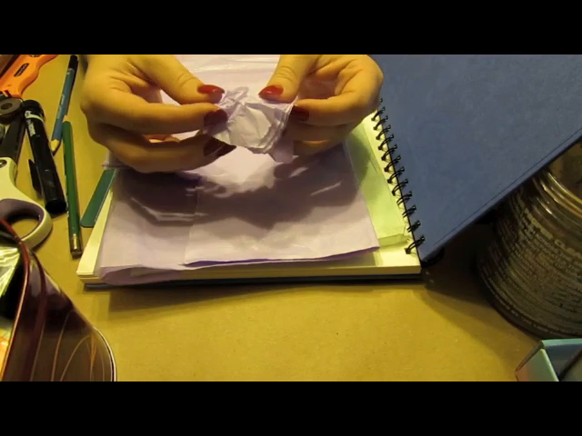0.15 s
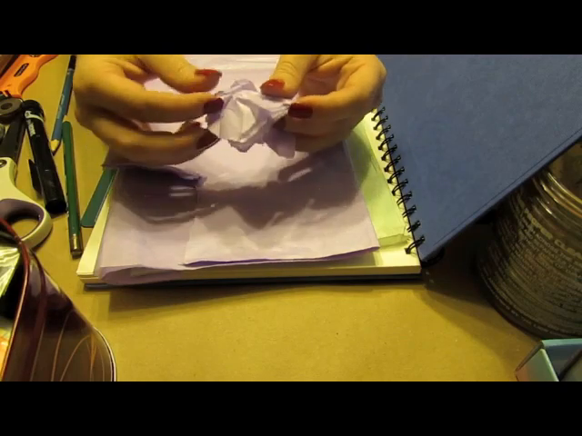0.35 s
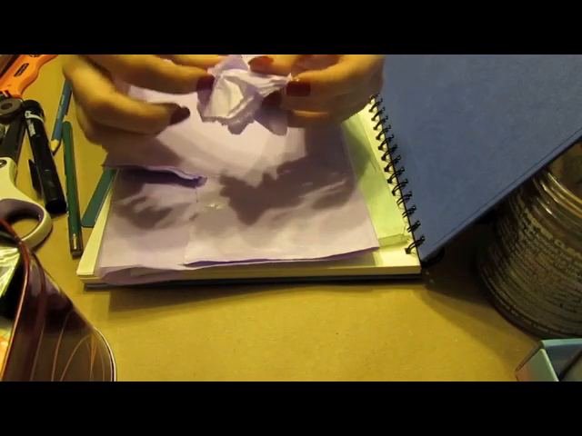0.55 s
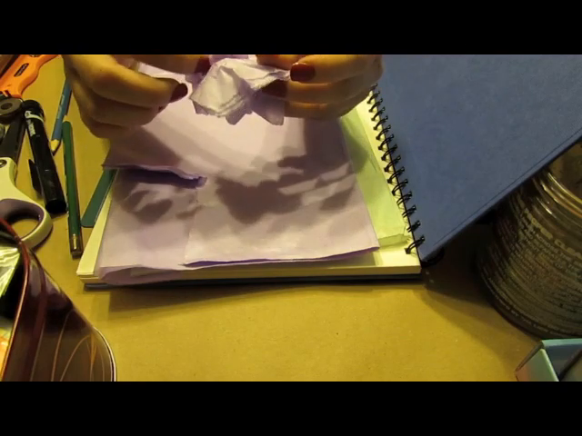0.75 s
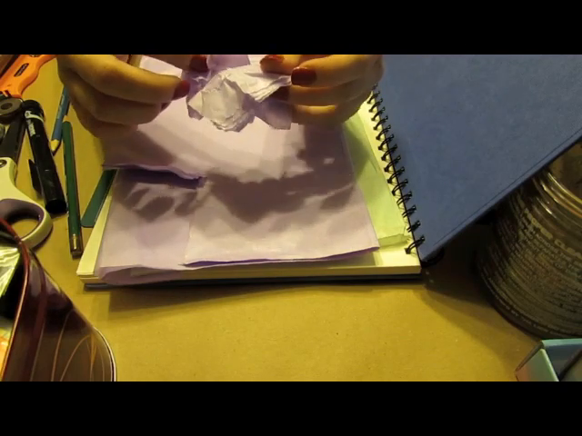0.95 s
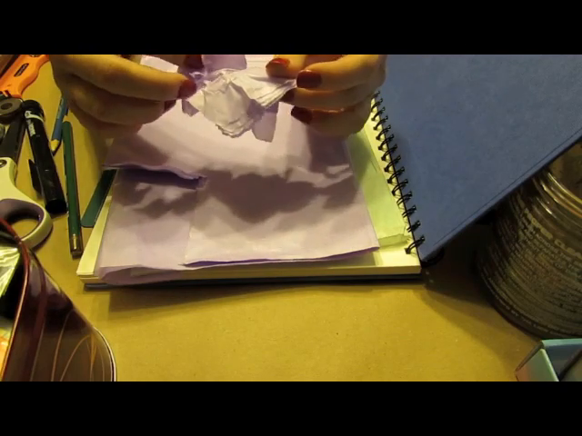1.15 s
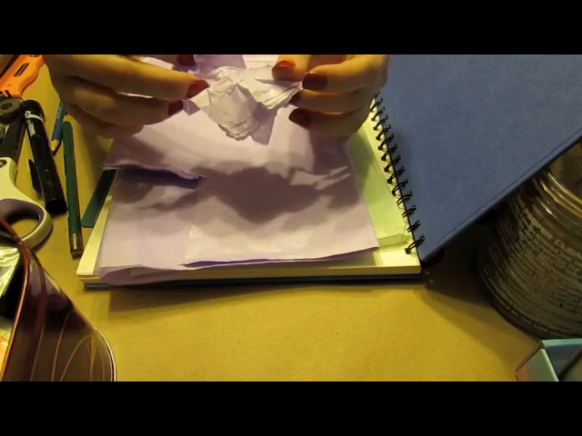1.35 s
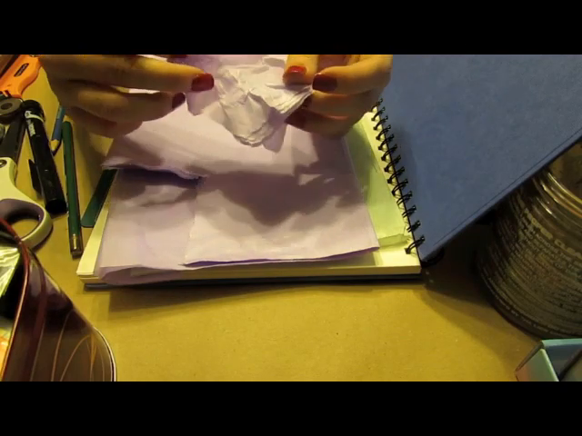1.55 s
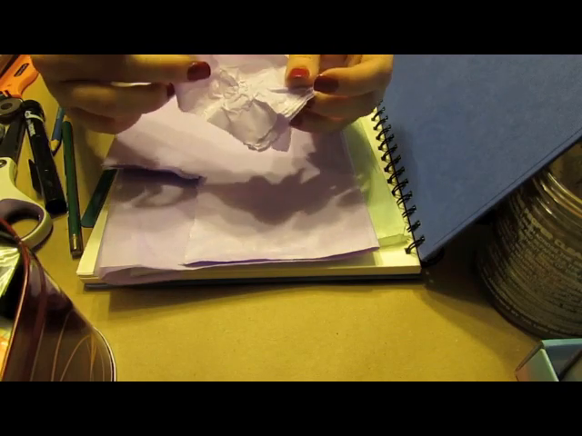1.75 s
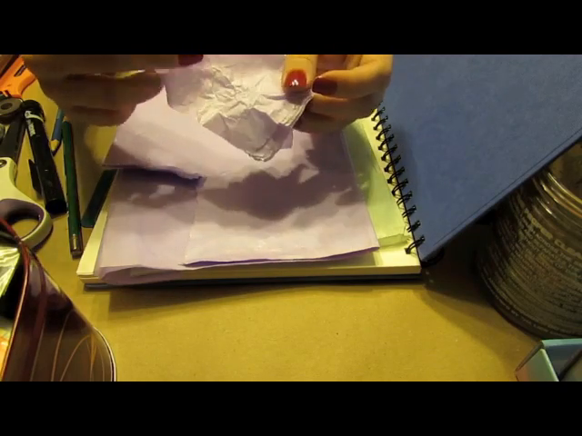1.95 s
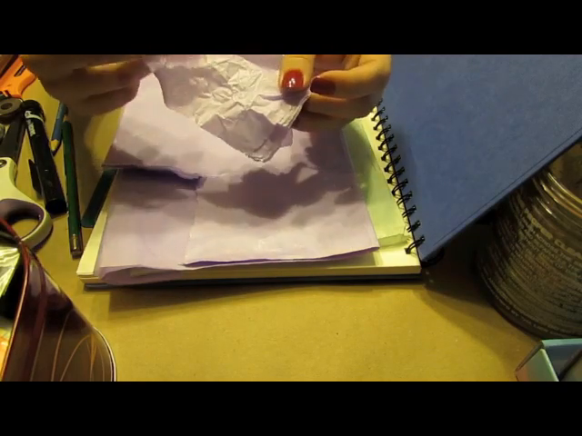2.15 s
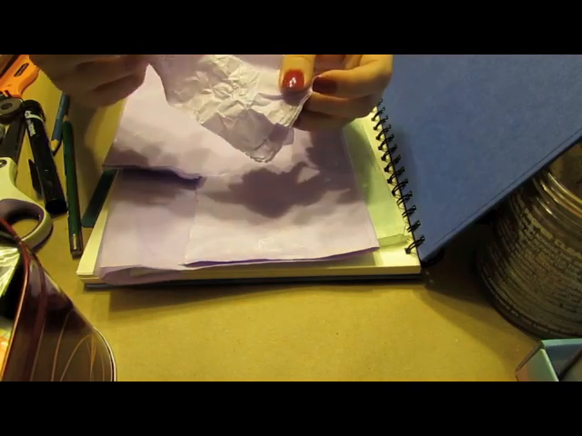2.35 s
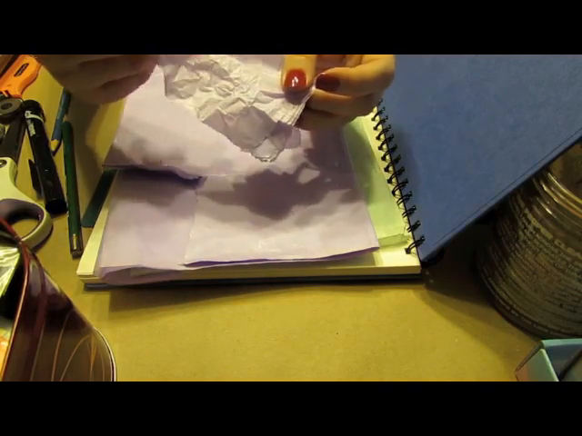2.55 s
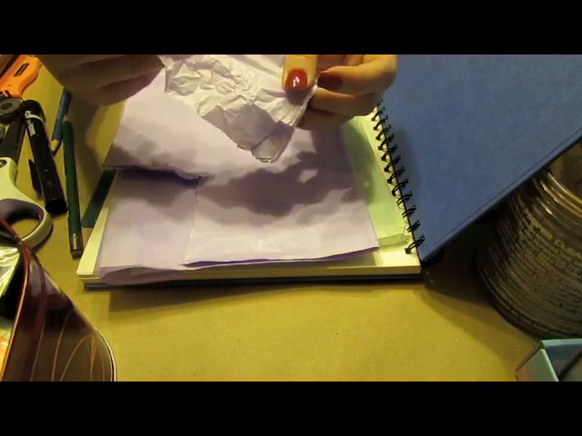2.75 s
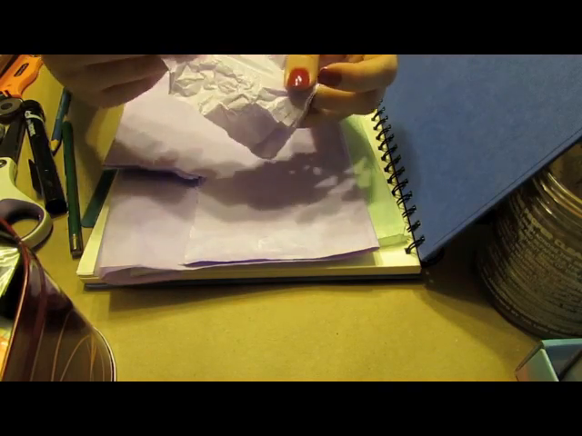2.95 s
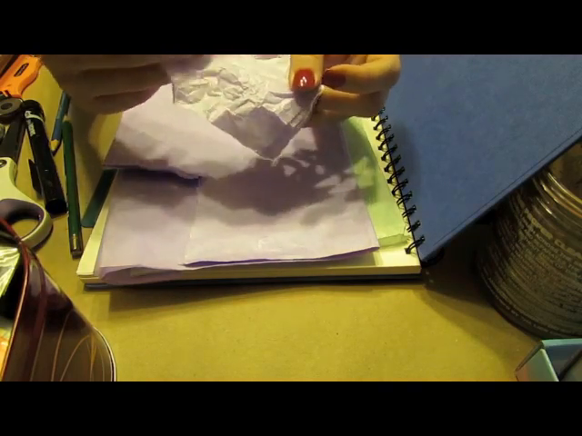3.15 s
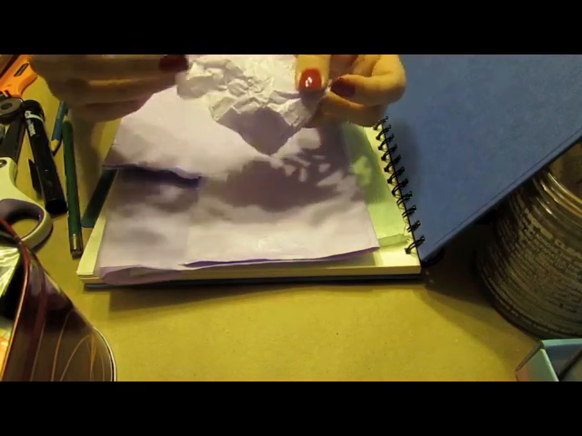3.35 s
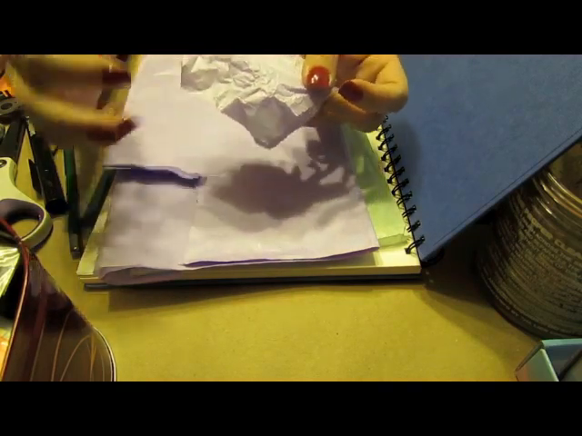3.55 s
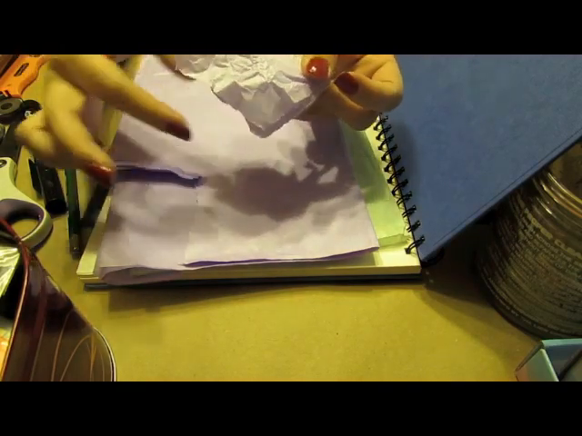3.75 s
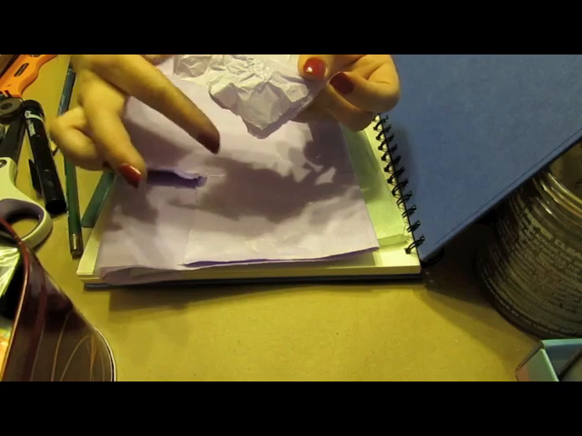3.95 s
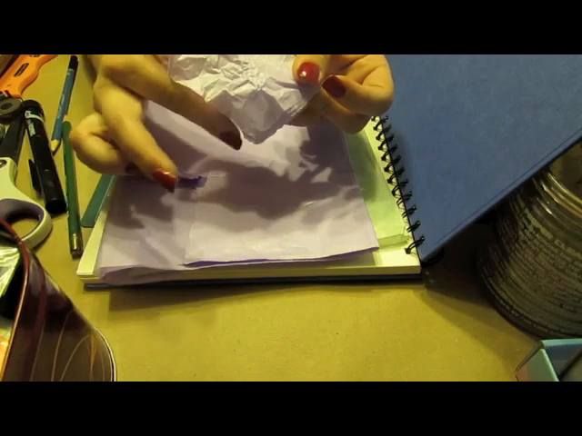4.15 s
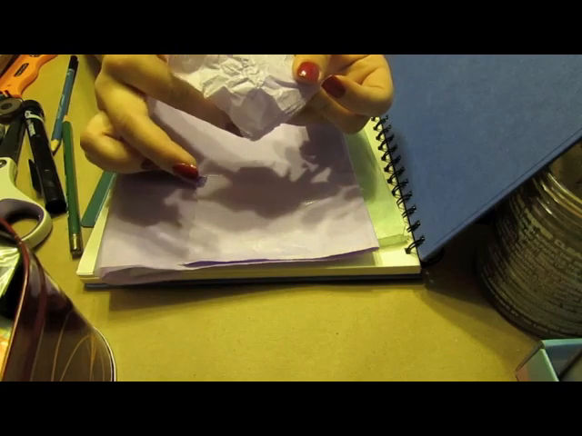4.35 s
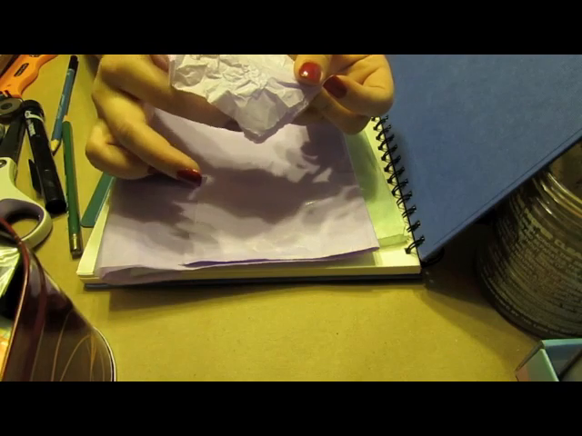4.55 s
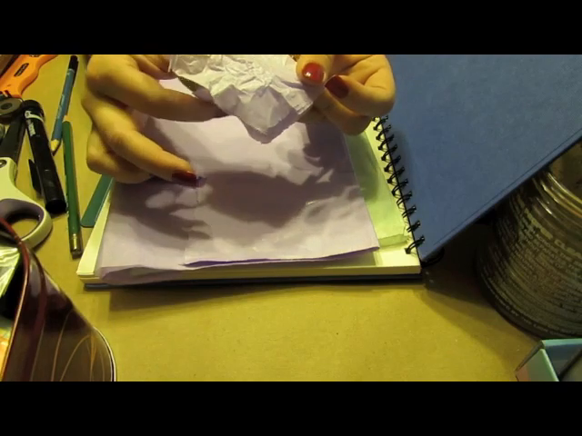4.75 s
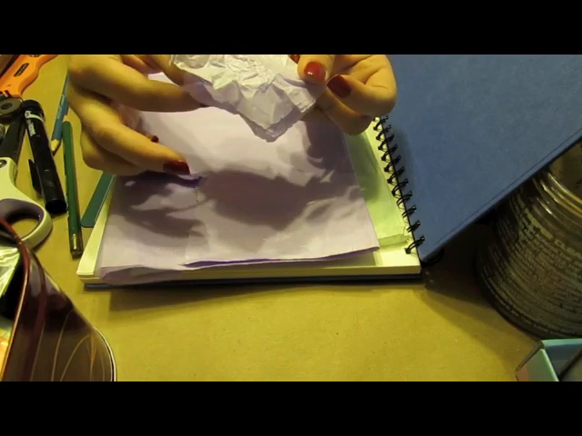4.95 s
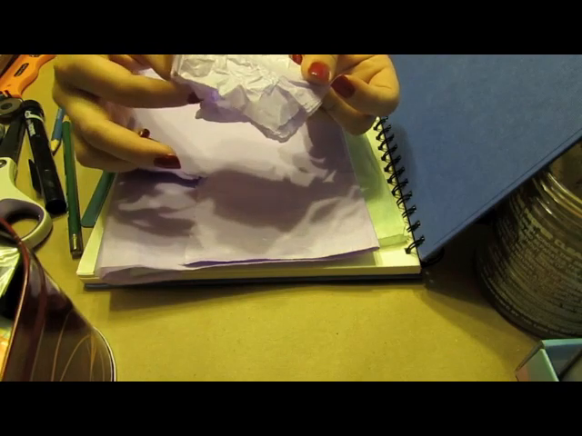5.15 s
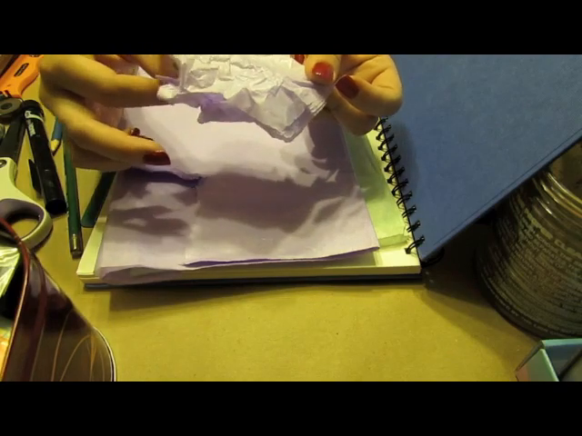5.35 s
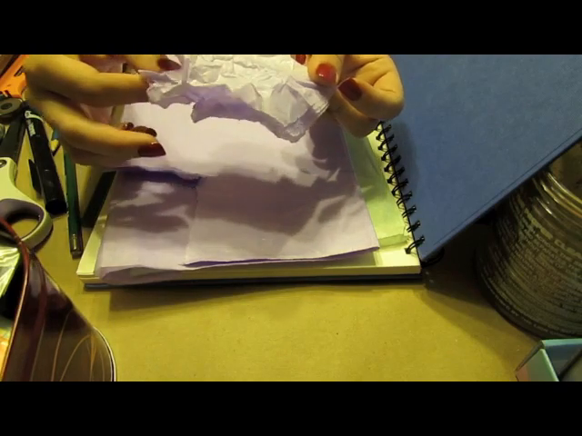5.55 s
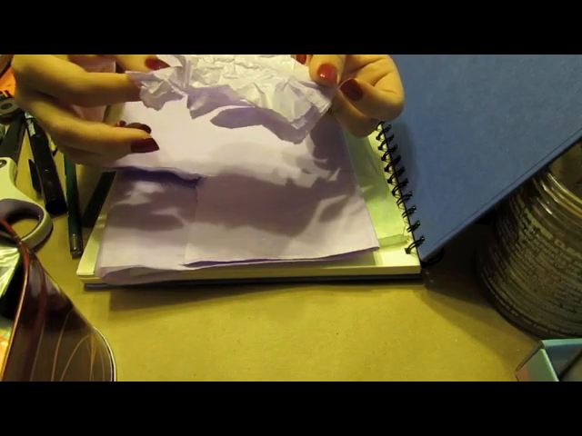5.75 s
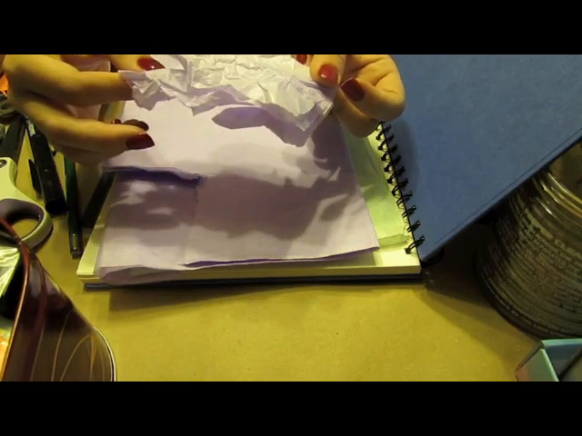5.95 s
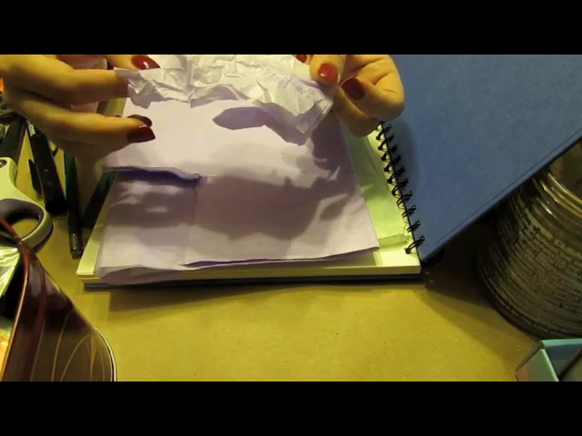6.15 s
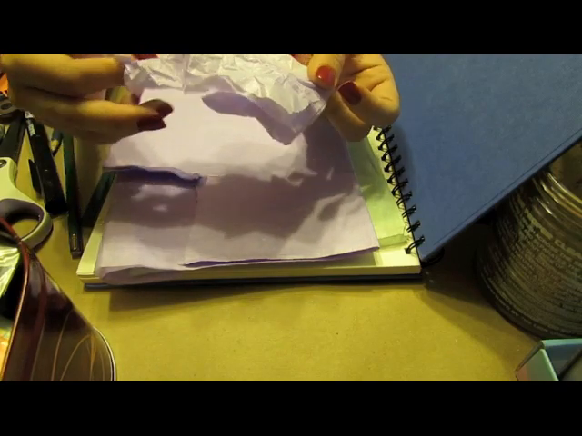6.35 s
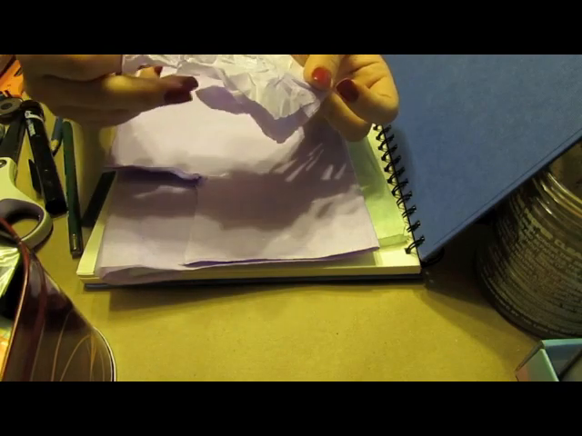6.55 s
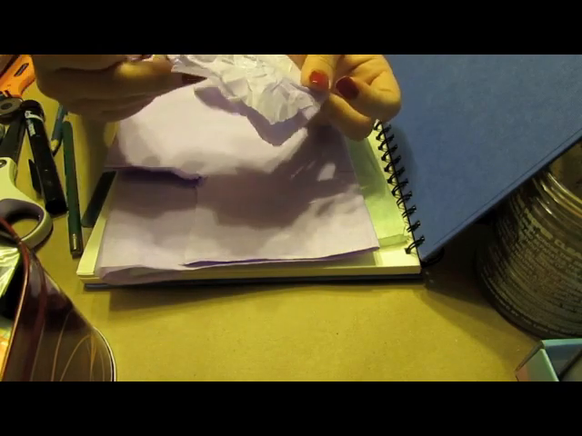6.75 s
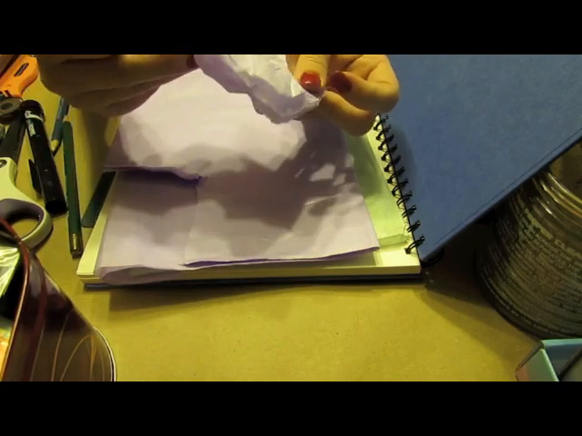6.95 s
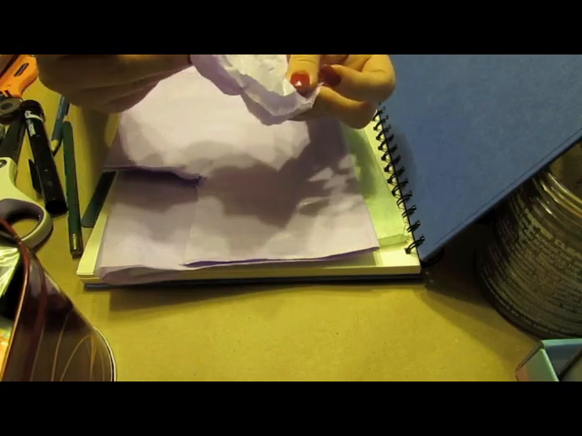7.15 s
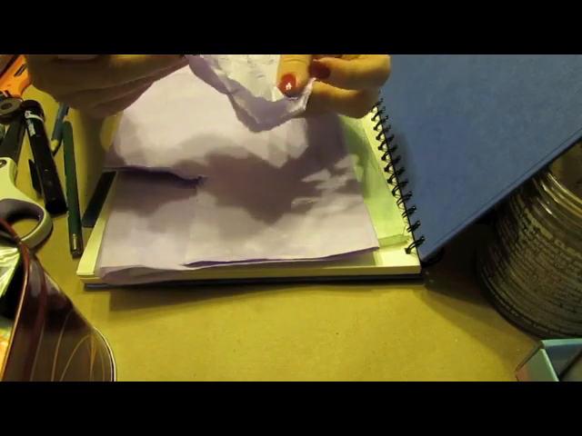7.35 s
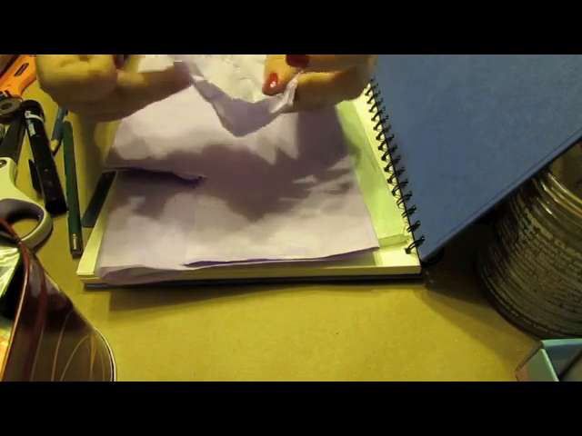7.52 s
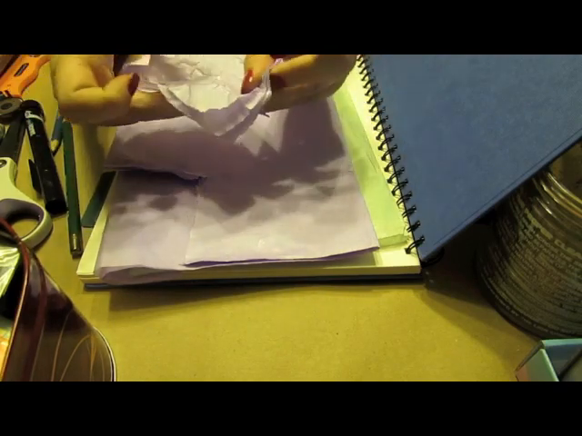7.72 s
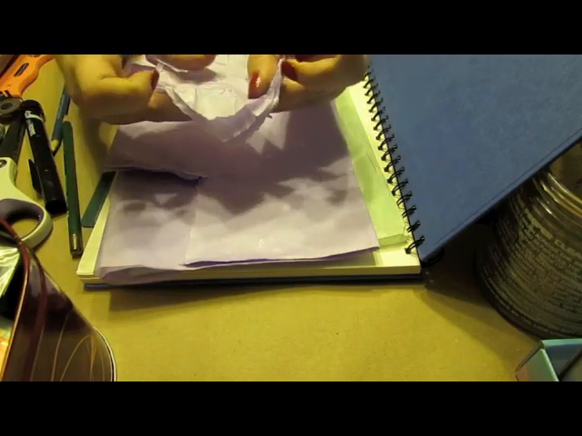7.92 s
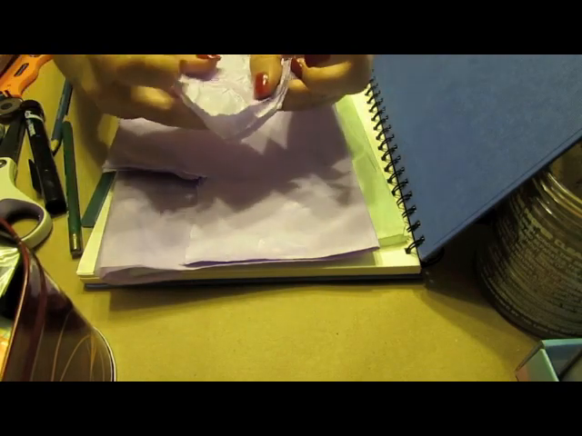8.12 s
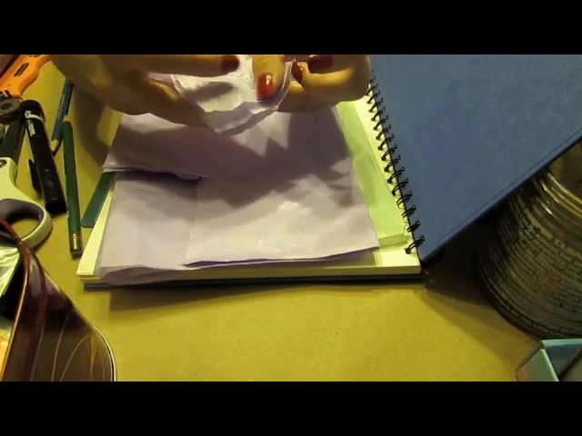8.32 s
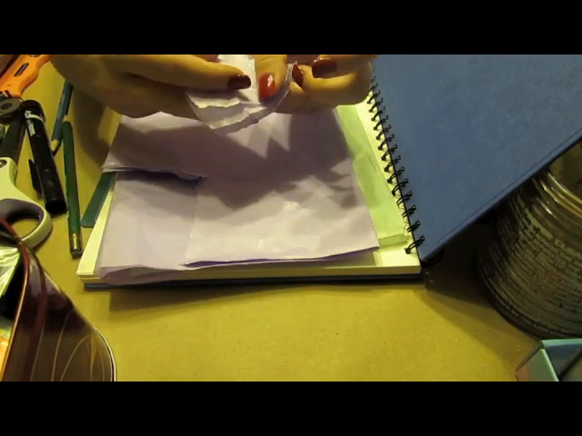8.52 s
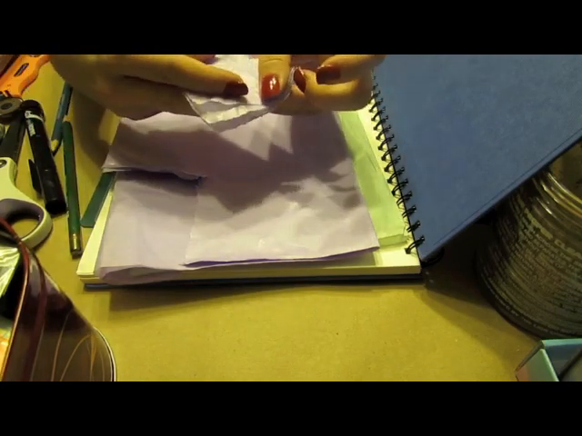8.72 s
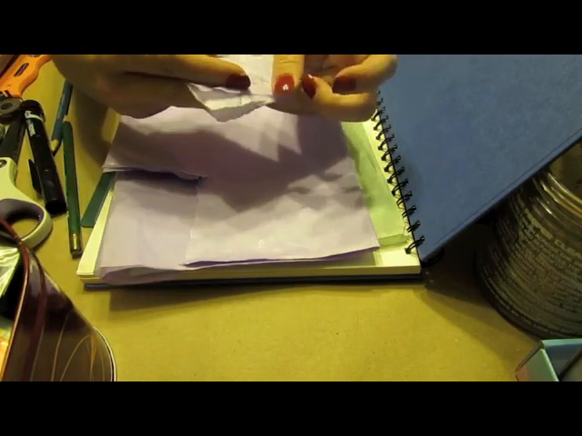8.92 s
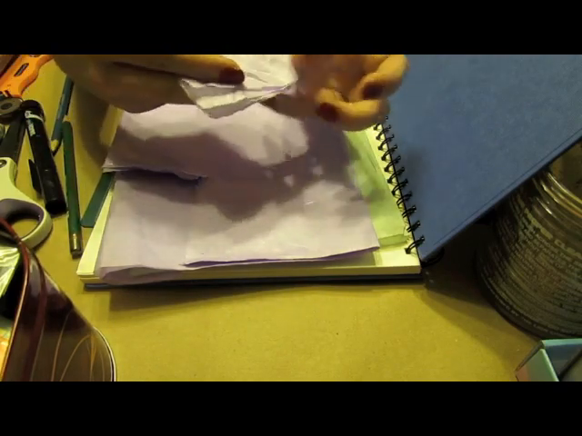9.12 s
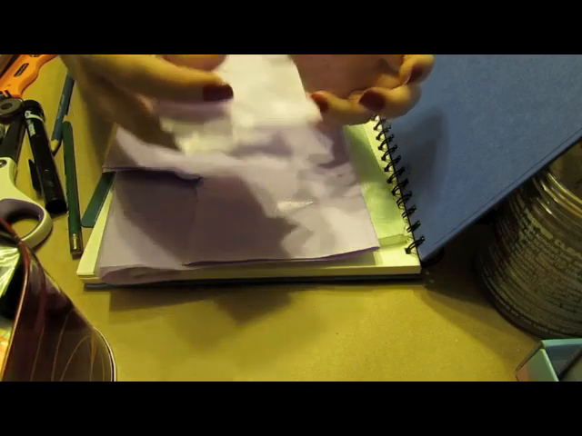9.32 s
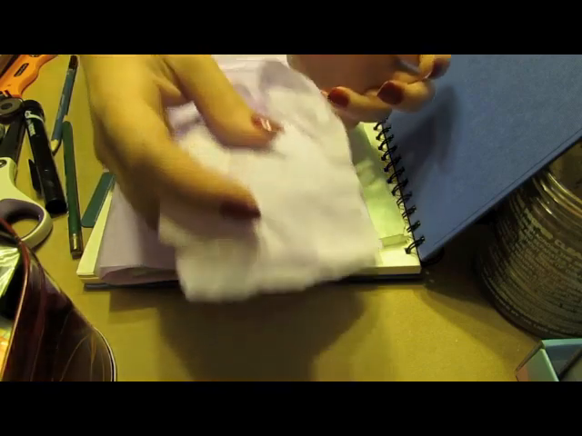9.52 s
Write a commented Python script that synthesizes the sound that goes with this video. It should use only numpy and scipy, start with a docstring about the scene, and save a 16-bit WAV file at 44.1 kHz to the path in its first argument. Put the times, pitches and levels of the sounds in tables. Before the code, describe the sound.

Hands work crinkly tissue at a desk: sharp dry crackles in clumps, loudest early on, brief lulls, with soft hiss and faint hum behind.

```python
"""Two hands crumple and unfold thin tissue paper over a desk, for about nine and a half seconds.
From the start a noisy hiss and a fan-like hum fill the room, under a rustle of tiny random cracks.
Creases snap singly and in clumps, as short noise bursts, and folds give way with dull, damped knocks.
The loudest snaps come from about 2 to 3 s; the rustle then sinks low from about 3.5 to 4.2 s.
Near 5.2 s the rustle rings briefly in one high band; echoes off the desk follow all the paper sounds."""
import sys
import numpy as np
from scipy import signal
from scipy.fft import rfft, irfft
from scipy.io import wavfile
from scipy.ndimage import uniform_filter1d

SR = 44100
rng = np.random.default_rng(int(sys.argv[2]) if len(sys.argv) > 2 else 0)


def materialize(psi):
    """Save the field psi as 16-bit PCM at rate SR to the path in sys.argv[1].

    A 1-D psi becomes a single channel; in a 2-D psi each row is a channel.
    """
    bounded = np.clip(np.atleast_2d(psi).T, -1, 1)
    quanta = np.round(bounded * 32767).astype(np.int16)
    wavfile.write(sys.argv[1], SR, quanta)


N = 422478  # length of the sound in samples

# how busily the hands work: start_s [s], rustle_db [dB, before dips, rests and squeezes],
# body_db [dB, dull flexing relative to the rustle, before the loudness correction]
HAND_WORK = [(0.0, -39, 1.5), (0.45, -45, -3), (0.8, -38.5, -4.5), (1.3, -44, -1.5), (1.55, -43, -3),
             (1.85, -46.5, 2), (2.1, -44, 0.5), (2.7, -41, 2.5), (2.97, -52, -0.5), (3.17, -30, -5),
             (3.33, -49, -3.5), (4.1, -52.5, -16), (4.25, -49, -4), (4.85, -43.5, -4), (5.12, -38, -4),
             (5.4, -51, -0.5), (6.05, -50, -2.5), (6.6, -45, -2.5), (7.05, -43, -2.5), (7.42, -49.5, -4.5),
             (7.95, -47, -1), (8.15, -37.5, -0.5), (8.45, -42, -0.5), (9.15, -45, 0), (9.58, -47.5, -7)]


def amp(db):
    """Turn decibels into a plain multiplier."""
    return 10 ** (np.asarray(db) / 20)


def evened(x):
    """Scale a sound to an average (rms) level of 1."""
    return x / np.sqrt(np.mean(x ** 2) + 1e-20)


def read(points, hz):
    """Read a curve at any frequency, joining its points on a logarithmic pitch scale."""
    point_hz, value = np.transpose(points)
    return np.interp(np.log(hz + 1), np.log(point_hz + 1), value)


def colour(x, points):
    """Shape the tone with a minimum-phase filter, so nothing sounds before a click."""
    hz = abs(np.fft.fftfreq(4096, 1 / SR))
    log_gain = np.log(amp(np.maximum(read(points, hz), -100)))
    # the Hilbert transform of the log gain gives the minimum phase
    taps = np.fft.ifft(np.exp(np.conj(signal.hilbert(log_gain)))).real[:2048]
    return signal.oaconvolve(x, taps)[:N]


def drift(per_s):
    """Slow random wandering of rms 1, changing about per_s times a second."""
    low_pass = signal.butter(2, min(per_s, 2000), fs=SR)
    return evened(signal.lfilter(*low_pass, rng.standard_normal(N)))


def room_air():
    """Room hiss: broad noise, partly shared by the left and right sides."""
    # tone of the room noise: pitch_hz [Hz], level_db [dB per Hz, relative]
    air_tone = [(20, -12.5), (35, -10.5), (50, -10.5), (118, -5), (250, -5), (500, -10.5), (1500, -16),
                (3700, -21.5), (4500, -16.5), (6000, -30), (10200, -30)]
    # how alike left and right are: pitch_hz [Hz], likeness [1 same, 0 unrelated, -1 opposite]
    likeness = [(60, 0.17), (170, 0.67), (480, -0.22), (1370, 0.041), (3890, -0.3), (11000, -1.1)]
    air_db = -48.5
    hz = np.fft.rfftfreq(N, 1 / SR)
    a, b = rfft(rng.standard_normal((2, N)))
    same = np.clip(read(likeness, hz), -1, 1)
    right = same * a + np.sqrt(1 - same ** 2) * b
    spectrum = np.array([a, right]) * amp(read(air_tone, hz))
    return amp(air_db) * evened(irfft(spectrum, N))


def hum():
    """Fan-like hum: noise in a few narrow low resonances, nearly the same at both sides."""
    # resonances: pitch_hz [Hz], width_hz [Hz], level_db [dB, rms over both sides]
    resonances = [(76.5, 24, -67.5), (147, 14, -57), (181.5, 12.3, -55.5), (222.3, 10, -65)]
    hz = np.fft.rfftfreq(N, 1 / SR)
    out = np.zeros((2, N))
    for pitch_hz, width_hz, level_db in resonances:
        a, b = rfft(rng.standard_normal((2, N)))
        peak = 1 / (1 + (2 * (hz - pitch_hz) / width_hz) ** 2)
        sides = np.array([a + 0.1 * b, 1.3 * (a - 0.44 * b)])
        out += amp(level_db) * evened(irfft(sides * peak, N))
    return out


def busy_db(t):
    """The level of the rustle, sinking gradually into each dip or rest and returning abruptly."""
    # brief dips of the rustle between snaps, and longer rests of the hands: start_s [s], length_s [s]
    dips = [(1.802, 0.0029), (1.888, 0.004), (2.337, 0.041), (3.552, 0.65), (6.236, 0.15), (7.552, 0.166),
            (9.513, 0.016)]
    dip_db, sink_s, return_s = -12, 0.035, 0.0082
    depth = np.zeros(len(t))
    for start_s, length_s in dips:
        sinking = (t - start_s) / sink_s + 1
        returning = (start_s + length_s - t) / return_s + 1
        depth += np.clip(np.minimum(sinking, returning), 0, 1)
    start_s, rustle_db, _ = np.transpose(HAND_WORK)
    return np.interp(t, start_s, rustle_db) + dip_db * depth


def random_sizes(per_s, spread_db):
    """Clicks at random moments, mostly small and a few large, with silence between."""
    size = amp(spread_db * np.minimum(rng.exponential(1, N), 4))
    return size * (rng.random(N) < per_s / SR)


def cracks(per_s, spread_db, clump_db, clumps_per_s, decay_s):
    """Random clicks, each spread into a brief noise burst, and the wandering level that clumps them."""
    size = random_sizes(per_s, spread_db)
    # each click's energy dies away over decay_s
    burst = np.sqrt(signal.lfilter([1], [1, -np.exp(-1 / (decay_s * SR))], size ** 2))
    return amp(clump_db * drift(clumps_per_s)), burst * rng.standard_normal(N)


def ticks(per_s, spread_db, count):
    """Small separate creases, each about a millisecond long, in count kinds with their own pitch."""
    size = random_sizes(per_s, spread_db)
    kind, t = rng.integers(0, count, N), np.arange(200) / SR
    out = np.zeros(N)
    for k, (pitch, length) in enumerate(rng.random((count, 2))):
        shape = np.exp(-(t / (.0002 + .0004 * length) - 1.5) ** 2)
        tone = np.sin(2 * np.pi * (4500 + 5000 * pitch) * t)
        tick = shape * (tone + 1.6 * rng.standard_normal(len(t)))
        out += signal.oaconvolve(size * (kind == k), tick)[:N]
    return out


def patchy(x, patchy_db):
    """Each fold has its own ring: the colour drifts in patches of about 1 kHz by tens of milliseconds."""
    z = signal.stft(x, nperseg=256, noverlap=192)[2]
    patches = uniform_filter1d(rng.standard_normal(z.shape), size=7, axis=0)  # smooth over pitch
    patches = uniform_filter1d(patches, size=12, axis=1)  # smooth over time
    return signal.istft(z * amp(patchy_db * evened(patches)), nperseg=256, noverlap=192)[1][:N]


def rustle():
    """Crisp cracks, scattered ticks and the duller flexing of the sheet follow the same hands."""
    # squeezes that set off a run of cracks: middle_s [s], length_ms [ms], level_db [dB]
    squeezes = [(0.07, 26, -43.5), (0.34, 127, -36), (0.442, 14, -36), (0.58, 43, -38), (0.686, 19, -39),
                (0.75, 86, -32.5), (0.903, 38, -34), (1.091, 103, -38.5), (1.206, 13, -38),
                (1.463, 79, -35), (1.567, 44, -35), (1.653, 7.7, -31), (1.786, 18.4, -30.5),
                (1.901, 16, -31), (1.99, 8.6, -28.5), (2.021, 36, -36.5), (2.14, 12, -26.5),
                (2.202, 20, -32.5), (2.231, 17, -34), (2.28, 11.3, -36.5), (2.389, 12, -30),
                (2.716, 7.4, -20), (2.889, 21, -32), (3.07, 76, -39), (3.128, 34, -35), (3.164, 59, -28.5),
                (3.24, 63, -36), (4.202, 17, -37.5), (4.38, 37, -42), (4.5, 66, -40), (4.7, 89, -43.5),
                (4.884, 40, -37), (5.03, 64, -38), (5.089, 34, -33), (5.139, 10, -32), (5.62, 210, -45.5),
                (5.727, 17.4, -27.5), (5.772, 100, -39.5), (6.123, 15.4, -30), (6.166, 60, -33.5),
                (6.405, 11, -40), (6.462, 10, -35), (6.523, 48, -33), (6.557, 23, -31.5),
                (6.725, 14, -29.5), (6.874, 22, -29.5), (6.9, 55, -36.5), (6.917, 15, -28),
                (7.016, 8.9, -32.5), (7.041, 19, -33), (7.135, 14, -35.5), (7.305, 72, -38),
                (7.485, 9.9, -29.5), (7.5, 80, -45), (7.74, 66, -38.5), (7.788, 28, -33), (7.912, 86, -38),
                (8.057, 11, -35), (8.081, 43, -35), (8.136, 51, -34), (8.341, 49, -36), (8.427, 8.2, -30),
                (8.508, 17, -39.5), (8.627, 39, -37.5), (8.756, 20, -42), (8.817, 21, -37),
                (8.942, 67, -36.5), (9.016, 44, -40.5), (9.048, 6.3, -33.5), (9.17, 58, -37),
                (9.34, 51, -41.5)]
    # rubbing is smooth, pulling creases apart is ticky:
    # start_s [s], ticks_db [dB relative to the fine cracks, before squeezes calm them]
    ticky = [(0, -2.5), (1.5, -2.5), (1.7, 2), (2.95, 2), (3.1, -5), (5.2, -5), (5.4, 0), (9.58, -1)]
    # tone of the tiny cracks: pitch_hz [Hz], level_db [dB per Hz, relative]
    crisp_tone = [(1200, -19), (2000, -54.5), (3100, -27.5), (4600, 2.5), (6000, 4.5), (8700, 3),
                  (10300, -0.5), (13000, -67)]
    # tone of the flexing sheet: pitch_hz [Hz], level_db [dB per Hz, relative]
    body_tone = [(150, -30.5), (250, -9.5), (305, -14), (512, -10), (722, -6.5), (2080, -3), (3500, -6.5),
                 (4550, -1), (7700, -120)]
    # the body loses this share, in dB, per dB of rustle above the usual level
    brighten, usual_db = 0.18, -42

    t = np.arange(N) / SR
    steady_db = busy_db(t)
    power = amp(steady_db) ** 2
    for middle_s, length_ms, squeeze_db in squeezes:
        first = max(round((middle_s - length_ms / 1000) * SR), 0)
        near = slice(first, round((middle_s + length_ms / 500) * SR))
        u = (t[near] - middle_s) * 2000 / length_ms + .15
        # a run starts suddenly and thins out
        run = np.exp(-np.where(u < 0, u ** 4, 1.4 * u ** 1.5))
        power[near] += amp(squeeze_db) ** 2 * run

    clumps, fine = cracks(per_s=1500, spread_db=3.3, clump_db=1.9, clumps_per_s=60, decay_s=.0003)
    flex_clumps = amp(1.5 * drift(30))
    scattered = evened(ticks(per_s=280, spread_db=3, count=40))
    calm = np.sqrt(amp(steady_db) / np.sqrt(power))  # ticks grow less than the rustle in a squeeze
    tick_level = calm * amp(np.interp(t, *np.transpose(ticky)))
    both = evened(fine) * clumps + tick_level * scattered
    crisp = cupped(evened(patchy(colour(both, crisp_tone), patchy_db=1.1)))

    flex = 0.7 * rng.standard_normal(N) + both
    body = evened(patchy(colour(flex, body_tone), patchy_db=1.6) * flex_clumps)
    start_s, _, body_db = np.transpose(HAND_WORK)
    above_usual_db = 10 * np.log10(power) - usual_db
    body_level = amp(np.interp(t, start_s, body_db) - brighten * above_usual_db)
    return np.sqrt(power) * (crisp + body_level * body)


def desk(x):
    """Echoes off desk, hands and walls: sparse taps of random sign, dying quickly and then slowly."""
    at = np.arange(12, 9000, 12) + rng.integers(0, 12, (3, 2, 749))
    taps = np.zeros((3, 2, 9100))  # three sets of echoes, two sides
    np.put_along_axis(taps, at, rng.choice([-1., 1.], at.shape), 2)
    t = np.arange(9100) / SR
    # 60 dB down in 0.026 s, over a weaker tail that takes 0.2 s
    taps *= amp(-60 * t / 0.026) + amp(-34 - 60 * t / 0.2)
    # the three sets take turns, 4.5 rounds a second, as the hands move
    turn = 2 * np.pi * (4.5 * np.arange(N) / SR + np.arange(3)[:, None] / 3)
    fed = np.sqrt(2 / 3) * np.cos(turn) * x
    echoes = signal.oaconvolve(fed[:, None], taps / np.linalg.norm(taps[0, 0]), axes=2)
    return echoes[..., :N].sum(0)


def snaps():
    """A buckling crease: a brief crack around its own pitch, a short sizzle and a faint pop of the sheet."""
    # creases that buckle: start_s [s], peak_db [dB, crack without its pop], crack_hz [Hz]
    creases = [(0.0577, -17, 5170), (0.0637, -20, 4500), (0.1051, -13.5, 9900), (0.1679, -25, 5450),
               (0.1944, -16.5, 6250), (0.218, -14, 6050), (0.2367, -18.5, 5730), (0.259, -19, 5810),
               (0.2784, -20, 9280), (0.3635, -18, 8700), (0.369, -15, 6700), (0.781, -16.5, 7000),
               (0.8733, -16, 8590), (0.8918, -19, 6270), (0.8973, -9, 7640), (0.912, -17, 6700),
               (0.917, -15, 7000), (0.9307, -19, 5940), (1.2377, -21, 6290), (1.248, -21, 7730),
               (1.3617, -17.5, 8650), (1.373, -15.5, 8300), (1.5253, -19.5, 7950), (1.5466, -23, 8350),
               (1.569, -19, 8010), (1.5831, -13, 9100), (1.5984, -17, 6500), (1.6432, -11.5, 6850),
               (1.6717, -20, 6180), (1.6934, -13, 8120), (1.7116, -21, 4440), (1.7202, -5.5, 6300),
               (1.7747, -10, 7340), (1.786, -16, 8310), (1.8118, -8.5, 9600), (1.8172, -14.5, 4870),
               (1.8226, -13, 6120), (1.8287, -18, 7060), (1.8354, -18, 9650), (1.8536, -20, 8290),
               (1.8599, -9.5, 6540), (1.8898, -14, 7210), (1.8934, -7.5, 5800), (1.8984, -6, 5950),
               (1.9, -9, 8530), (1.9065, -18, 7560), (1.9461, -19, 5960), (1.9732, -17, 8200),
               (1.988, -13.5, 8160), (2.0045, -14, 8160), (2.011, -16, 8250), (2.0205, -12, 5580),
               (2.0232, -21, 5200), (2.0512, -11.5, 5660), (2.0817, -12, 5560), (2.1236, -19, 8530),
               (2.133, -5, 7400), (2.14, -1, 8000), (2.1601, -18, 7540), (2.1911, -14, 5060),
               (2.1976, -20, 4780), (2.2093, -16, 5640), (2.2217, -20, 8980), (2.27, -7, 4900),
               (2.2746, -8, 7400), (2.278, -9, 5510), (2.2833, -7, 7520), (2.3088, -17, 7710),
               (2.31, -2.5, 8500), (2.3732, -17, 7880), (2.3831, -4.5, 8000), (2.3984, -2.5, 6640),
               (2.4268, -6.5, 5510), (2.4473, -4.5, 8900), (2.4632, -13, 8870), (2.5099, -6.5, 5660),
               (2.5227, -15, 5660), (2.5493, -12.5, 8850), (2.5715, -18, 8740), (2.5773, -20, 9430),
               (2.5941, -4.5, 5700), (2.5979, -8.5, 5900), (2.6071, -10, 6000), (2.626, -21, 8350),
               (2.6538, -14.5, 8200), (2.6856, -17, 5320), (2.7121, -22, 8630), (2.7154, -16, 8290),
               (2.7387, -23, 8720), (2.7476, -9, 7320), (2.801, -25, 8250), (2.8301, -17.5, 9130),
               (2.8336, -12, 5240), (2.879, -21, 5470), (2.893, -16, 5550), (2.9072, -14, 8500),
               (3.0509, -17, 7620), (3.0706, -17, 5050), (3.1142, -9.5, 8070), (3.1249, -15, 7540),
               (3.1593, -18, 6800), (3.233, -23, 8610), (3.2679, -14, 8270), (3.312, -14, 9100),
               (3.3499, -22, 5100), (3.4356, -17, 6460), (4.1195, -23, 7990), (4.2269, -14.5, 8420),
               (4.3815, -22, 7690), (4.3893, -18, 8200), (4.7036, -19, 7700), (4.7153, -15.5, 7460),
               (4.9374, -19, 9170), (4.9503, -23, 7170), (5.0981, -14.5, 9130), (5.1228, -25, 6460),
               (5.1344, -21, 8910), (5.1376, -26, 6370), (5.1451, -16.5, 6050), (5.1617, -22, 5770),
               (5.1646, -18, 6350), (5.186, -18.5, 5810), (5.2094, -23, 6520), (5.2257, -19.5, 6070),
               (5.294, -25, 5600), (5.313, -19, 6030), (5.3316, -30, 6090), (5.3706, -24, 6290),
               (5.4093, -16, 5840), (5.499, -25, 4260), (5.5594, -19, 4180), (5.6153, -22.5, 7240),
               (5.6305, -22, 4670), (5.6584, -24, 6000), (5.7153, -20, 4310), (5.7293, -14, 8250),
               (5.7582, -17, 8980), (5.9422, -18, 8010), (5.9615, -10.5, 8720), (5.9897, -24, 7750),
               (6.0006, -20, 8570), (6.1169, -14, 8030), (6.1236, -14, 6040), (6.1424, -17, 8330),
               (6.153, -18, 6850), (6.167, -18, 9300), (6.1784, -18, 5700), (6.185, -11.5, 6500),
               (6.2802, -17, 6900), (6.4496, -26, 7020), (6.4653, -22, 8140), (6.5574, -11.5, 7110),
               (6.5963, -15, 5570), (6.6093, -17, 8180), (6.7208, -21, 5430), (6.7576, -16.5, 8400),
               (6.791, -28, 9100), (6.868, -15, 6370), (6.876, -18, 7360), (6.9098, -8, 8500),
               (6.9184, -14, 8480), (6.9378, -17, 8510), (6.9522, -19, 8790), (6.9592, -15, 7390),
               (6.9647, -10, 7430), (7.0156, -17, 7080), (7.043, -19, 8140), (7.0904, -18.5, 4290),
               (7.1027, -19, 6500), (7.1178, -21, 6060), (7.1237, -9.5, 9700), (7.1714, -17.5, 8230),
               (7.187, -15, 5550), (7.2117, -15.5, 6030), (7.294, -17, 7800), (7.3604, -23, 7500),
               (7.4534, -18.5, 9100), (7.4657, -14.5, 8700), (7.4785, -9.5, 8400), (7.4817, -21, 5940),
               (7.4967, -17, 6660), (7.5304, -20, 8830), (7.5435, -13.5, 8800), (7.6103, -16, 9400),
               (7.6629, -17, 8600), (7.6953, -24, 8890), (7.7155, -10.5, 8350), (7.7928, -17.5, 5770),
               (7.8742, -17, 9400), (7.9108, -13.5, 8630), (7.9694, -18, 7200), (8.0021, -12, 6100),
               (8.0416, -20, 6050), (8.0754, -17, 4560), (8.086, -22, 9410), (8.1296, -20, 6500),
               (8.1331, -16, 7170), (8.137, -15, 8070), (8.1445, -19, 5490), (8.161, -20, 8070),
               (8.167, -14, 6550), (8.2115, -15, 6610), (8.2261, -18, 6180), (8.2483, -26, 7320),
               (8.2598, -22, 8680), (8.2939, -13.5, 9540), (8.3009, -21, 6590), (8.425, -23, 9370),
               (8.4548, -15.5, 6200), (8.5102, -20, 5540), (8.534, -16.5, 6570), (8.5479, -28, 6270),
               (8.594, -19, 6520), (8.5988, -23, 6980), (8.621, -15, 5600), (8.6344, -17, 5530),
               (8.664, -13, 5380), (8.6688, -15, 7840), (8.688, -18, 7820), (8.6928, -19, 6700),
               (8.7048, -19, 5430), (8.7452, -20, 5250), (8.7489, -25, 6460), (8.755, -19.5, 8760),
               (8.7596, -18, 8870), (8.7684, -18, 6980), (8.7908, -16, 8200), (8.809, -19, 5710),
               (8.8126, -18, 6890), (8.8222, -14.5, 5920), (8.8609, -18.5, 5750), (8.933, -16, 9700),
               (8.9382, -17, 5810), (8.978, -13, 5020), (9.0125, -12, 4260), (9.0422, -22, 5400),
               (9.045, -17, 5990), (9.0767, -18, 5730), (9.0813, -18, 5490), (9.0881, -20, 4840),
               (9.1081, -22, 5990), (9.1622, -17, 7750), (9.1843, -17, 5960), (9.2187, -20, 8150)]
    pop_db = -20.5  # relative to the crack's peak
    t, out = np.arange(500) / SR, np.zeros(N + 500)
    noise = rng.standard_normal((len(creases), 2, len(t)))
    chance = rng.random((len(creases), 2))
    for (start_s, peak_db, crack_hz), (wide, narrow), (pitch, size) in zip(creases, noise, chance):
        length_s = .0003 + .0004 * size
        burst = np.exp(-(t / length_s - 1.5) ** 2)
        sizzle = .42 * (1 - np.exp(-t / length_s)) * np.exp(-t / .002)
        wide_band = signal.butter(2, [0.59 * crack_hz, 11000], "band", fs=SR)
        narrow_band = signal.butter(1, [crack_hz / 1.06, crack_hz * 1.06], "band", fs=SR)
        wide = evened(signal.lfilter(*wide_band, wide))
        narrow = evened(signal.lfilter(*narrow_band, narrow))
        crack = (burst + sizzle) * (1.52 * wide + narrow)
        pop = amp(pop_db) * np.exp(-t / 0.002) * np.sin(2 * np.pi * (1000 + 1600 * pitch) * t)
        out[round(start_s * SR):][:len(t)] += amp(peak_db) * (crack / abs(crack).max() + pop)
    return out[:N]


def knocks():
    """A fold gives way: a few damped cycles of the sheet, roughened by noise; low knocks last longer."""
    # pops and dull knocks: start_s [s], peak_db [dB, before the low cut], pitch_hz [Hz]
    folds = [(0.3685, -22.5, 1610), (0.7203, -22.5, 1020), (1.6444, -29.5, 2190), (1.6712, -28, 1870),
             (1.775, -22.5, 1070), (1.7862, -21, 1920), (1.862, -21, 1110), (1.8934, -19.5, 1770),
             (1.9893, -29, 1900), (2.1338, -22, 2070), (2.1612, -18, 2500), (2.198, -23, 1810),
             (2.2696, -16, 2320), (2.279, -21, 1940), (2.399, -19, 1760), (2.511, -32, 2380),
             (2.5314, -20.5, 980), (2.6819, -14.5, 1900), (2.7176, -22, 2230), (2.747, -20, 2000),
             (3.1304, -21, 2220), (3.267, -25, 1740), (5.4901, -28.5, 980), (5.7986, -27, 1260),
             (6.1235, -28, 510), (6.4026, -25.5, 1165), (6.5982, -21, 1330), (6.6896, -30.5, 865),
             (6.7398, -28, 750), (6.8762, -28, 674), (6.9113, -22, 1550), (8.0749, -28, 2220),
             (8.758, -23, 2200), (8.7907, -27, 1470), (8.9773, -24.5, 1600), (9.0125, -19, 1590),
             (9.0463, -26, 2090), (9.112, -24, 995), (9.1706, -24, 1540)]
    decay_cycles = 2.13
    t, out = np.arange(900) / SR, np.zeros(N + 900)
    noises = rng.standard_normal((len(folds), len(t)))
    for (start_s, peak_db, pitch_hz), noise in zip(folds, noises):
        wobble = 1.48 * evened(uniform_filter1d(noise, size=40))
        ring = np.sin(2 * np.pi * pitch_hz * t + wobble)
        shape = (1 - np.exp(-t / 0.00035)) * np.exp(-t * pitch_hz / decay_cycles)
        out[round(start_s * SR):][:len(t)] += amp(peak_db) * shape / shape.max() * ring
    return signal.lfilter(*signal.butter(2, 300, "high", fs=SR), out[:N])


def cupped(x):
    """For a moment the half-open sheet rings in one high band, swelling and fading smoothly."""
    middle_s, length_s, ring_hz, ring_db = 5.24, 0.12, 6000, 5.3
    band = signal.butter(1, [ring_hz / 1.02, ring_hz * 1.05], "band", fs=SR)
    swell = np.exp(-((np.arange(N) / SR - middle_s) / length_s) ** 2)
    return x + amp(ring_db) * swell * signal.lfilter(*band, x)


def scene():
    """Paper sounds almost centred, a touch to the right, with their echoes and the room's noises."""
    paper = snaps() + rustle() + knocks()
    direct = paper * amp([[-.2], [.2]])  # left, right
    return direct + amp(-6.5) * desk(paper) + room_air() + hum()


def record(dry):
    """Gain control dips after the loudest snaps and recovers slowly; then the highest treble is cut."""
    limit_db, recover_db_per_s, squash = -22, 4.5, 0.83  # squash: dB taken off per dB over the limit
    treble_limit_hz = 10450
    power = abs(uniform_filter1d((dry ** 2).mean(0), size=300))
    level_db = 10 * np.log10(power + 1e-12)
    # hold each peak, letting it sink at the recovery rate
    fall_db = np.arange(N) * recover_db_per_s / SR
    held_db = np.maximum.accumulate(level_db + fall_db) - fall_db
    over_db = np.maximum(held_db - limit_db, 0)
    late_db = signal.lfilter([.002], [1, -.998], over_db)  # reacts about 11 ms late
    low_pass = signal.firwin(301, treble_limit_hz, window=("kaiser", 8), fs=SR)
    return signal.oaconvolve(dry / amp(squash * late_db), low_pass[None], "same")


dry = scene()
out = record(dry)
materialize(out)
```